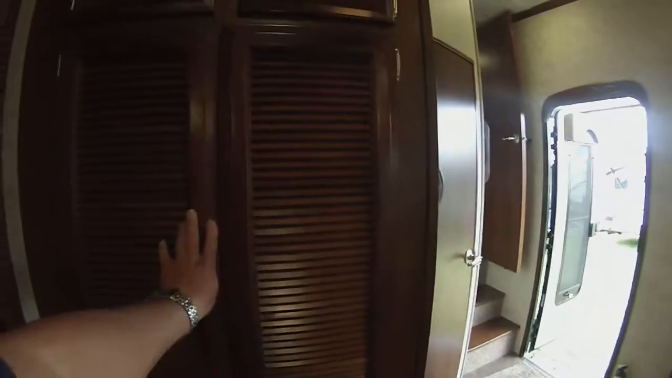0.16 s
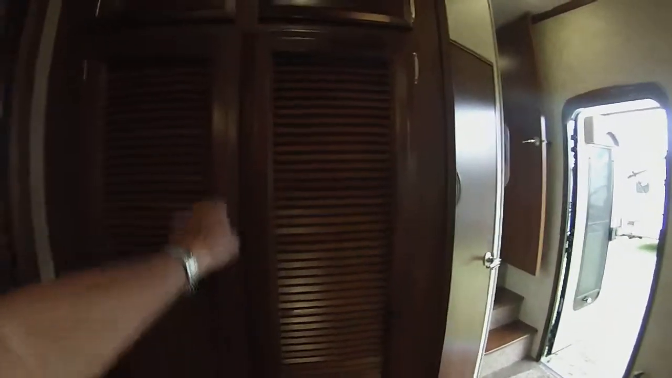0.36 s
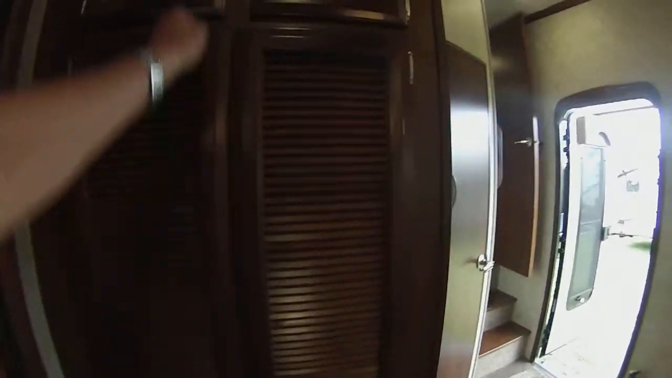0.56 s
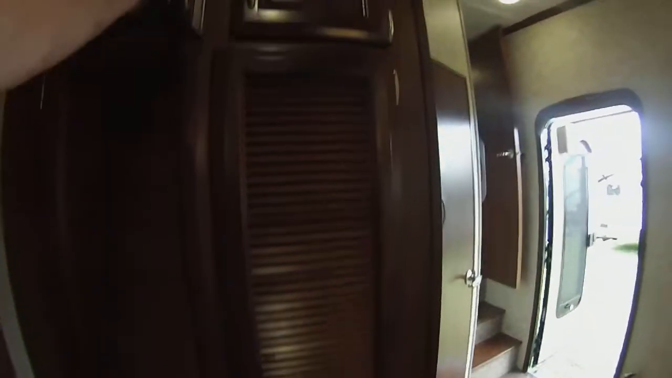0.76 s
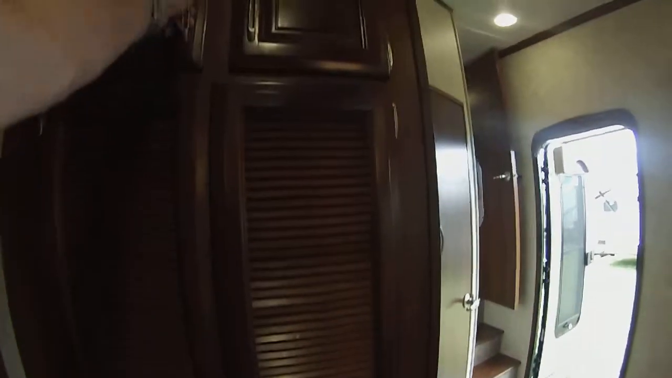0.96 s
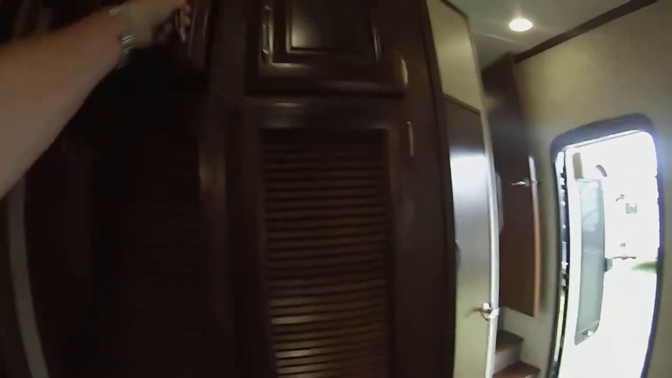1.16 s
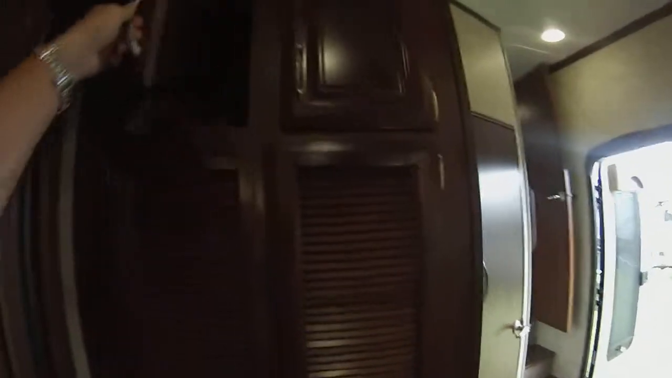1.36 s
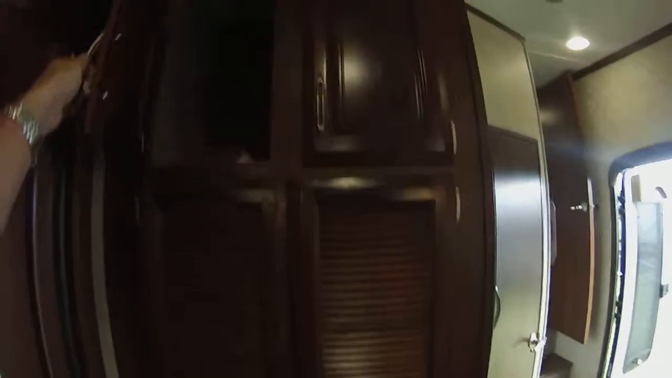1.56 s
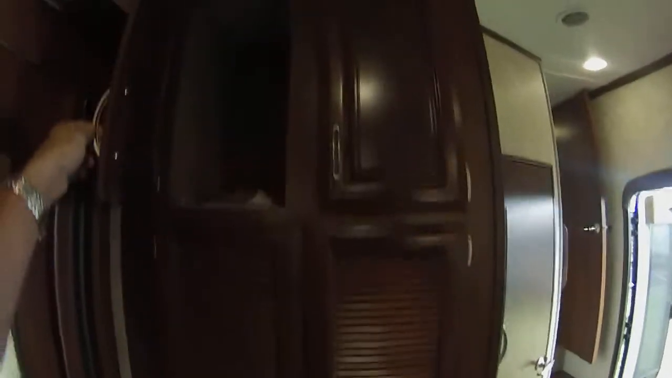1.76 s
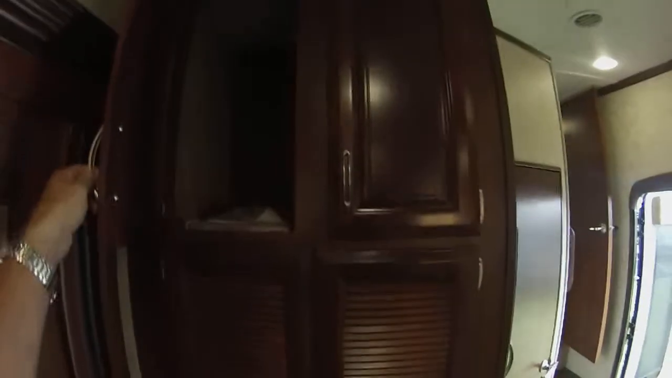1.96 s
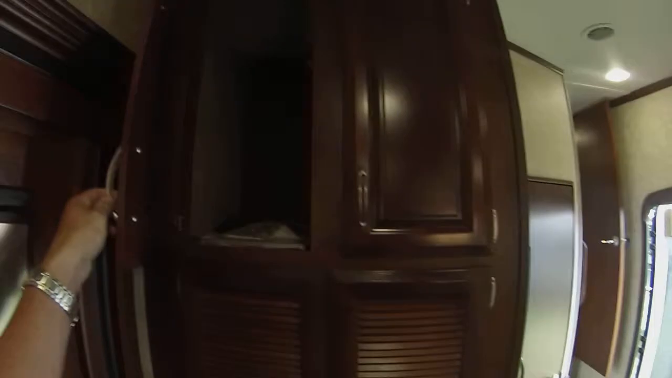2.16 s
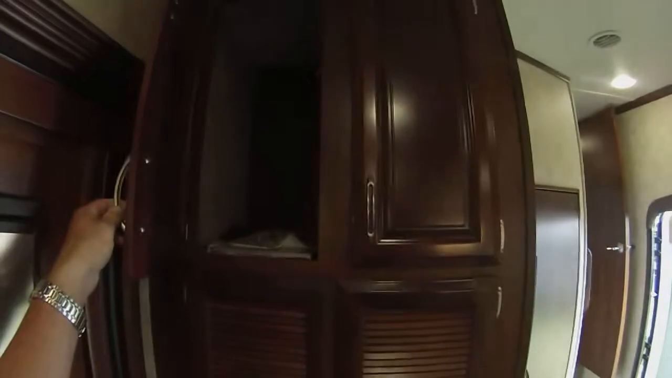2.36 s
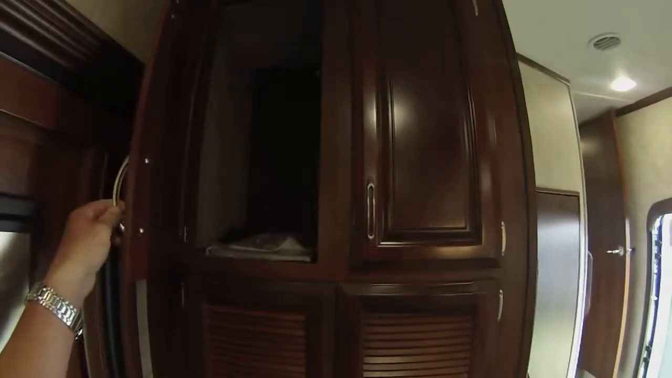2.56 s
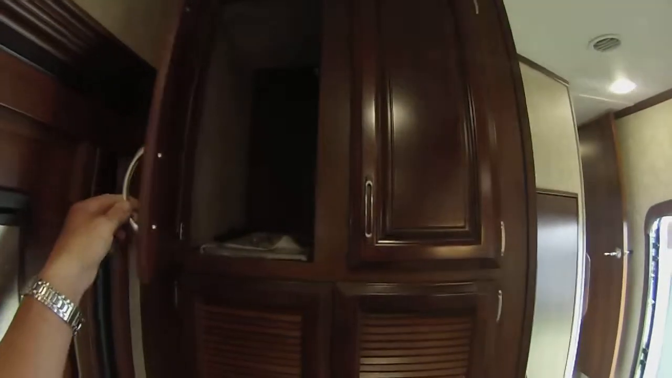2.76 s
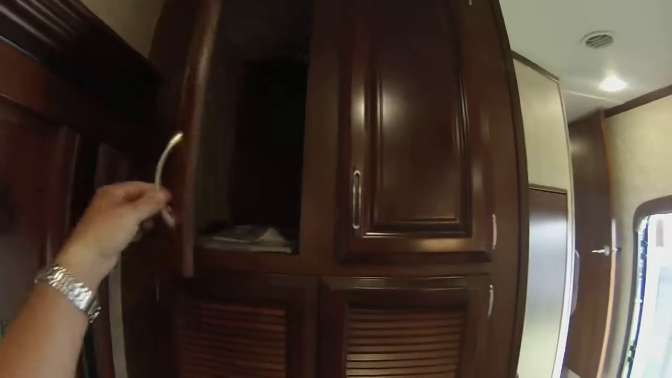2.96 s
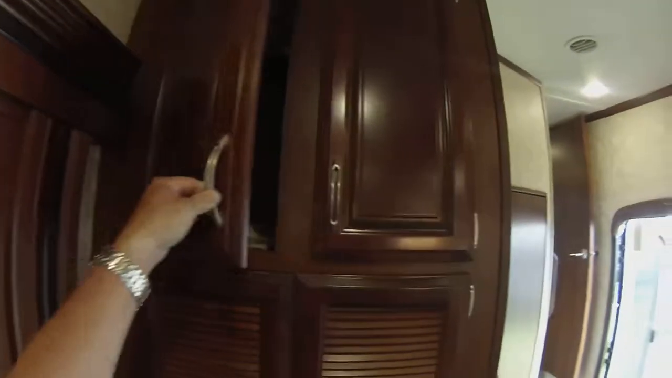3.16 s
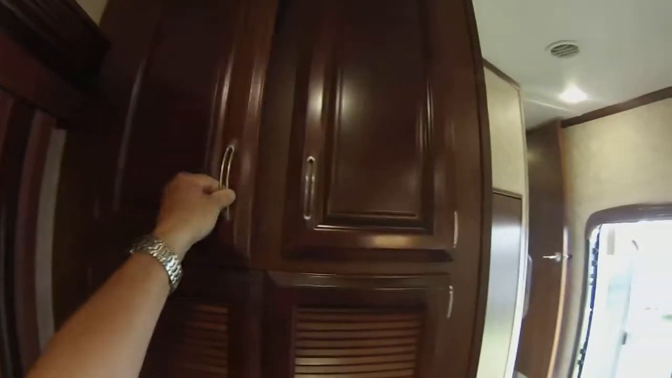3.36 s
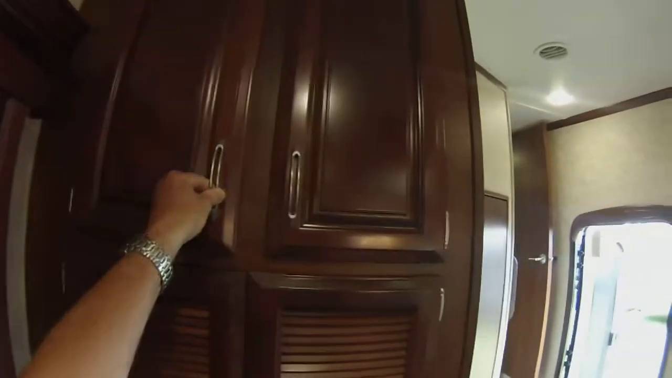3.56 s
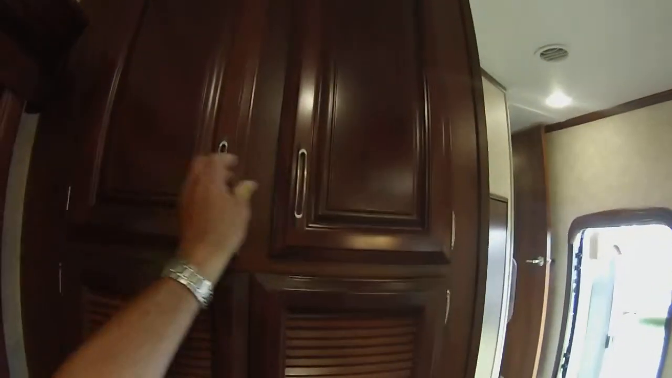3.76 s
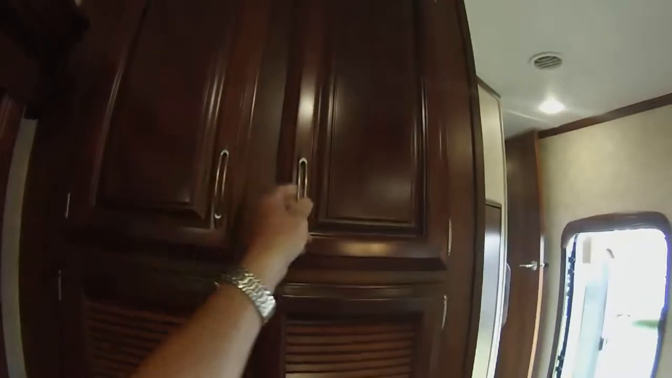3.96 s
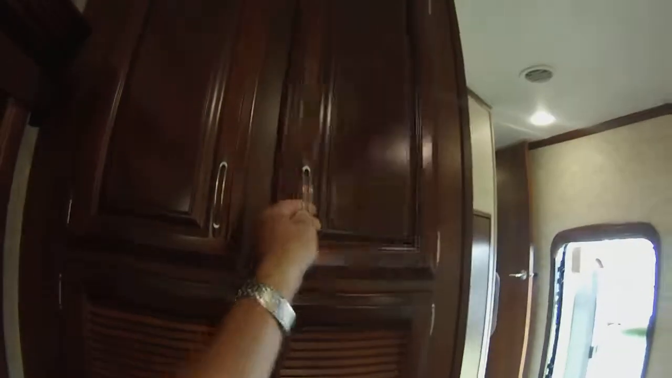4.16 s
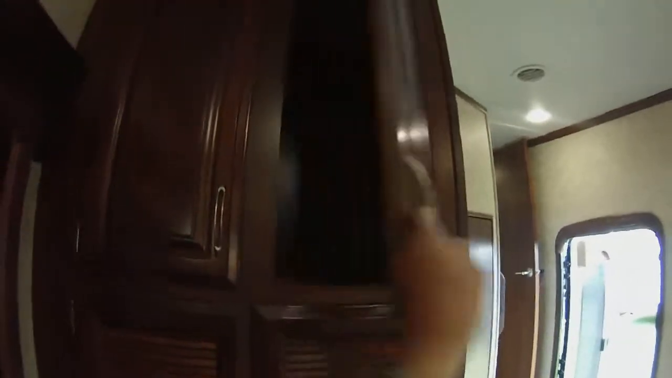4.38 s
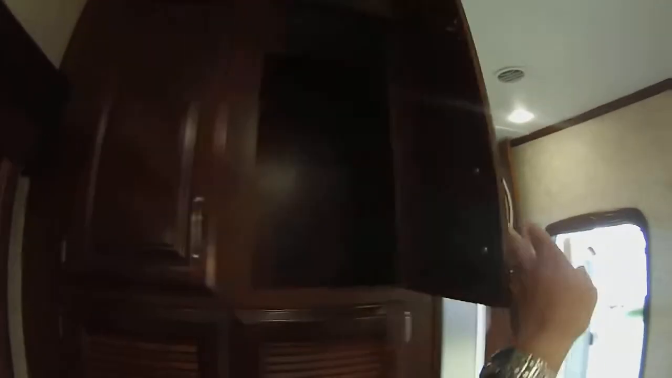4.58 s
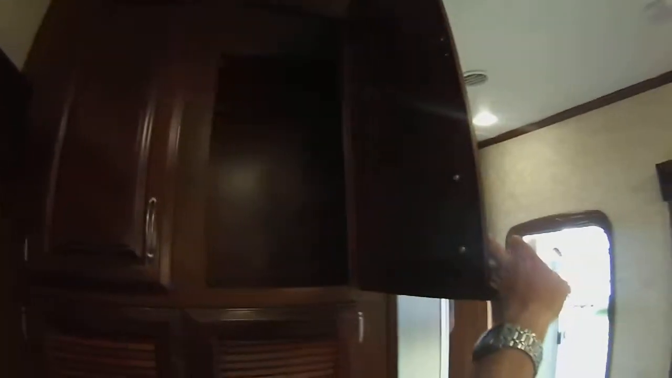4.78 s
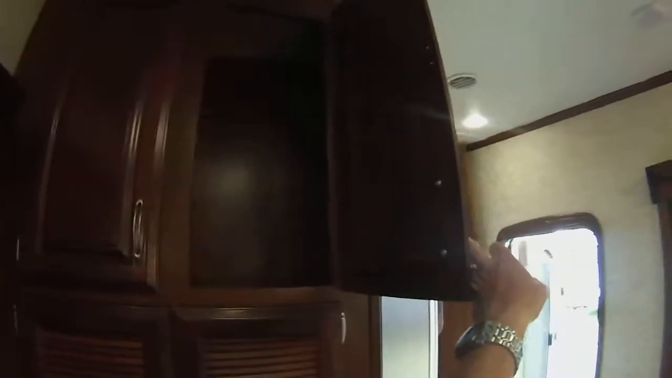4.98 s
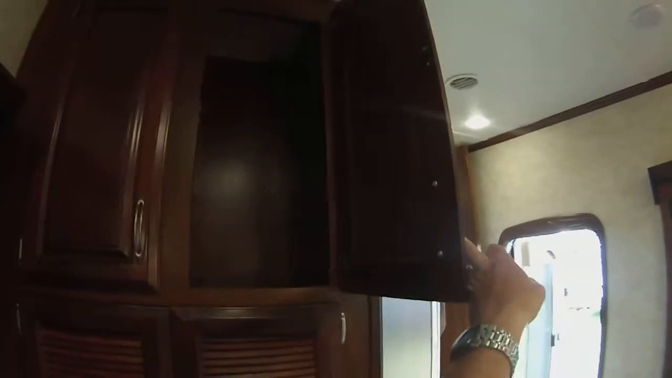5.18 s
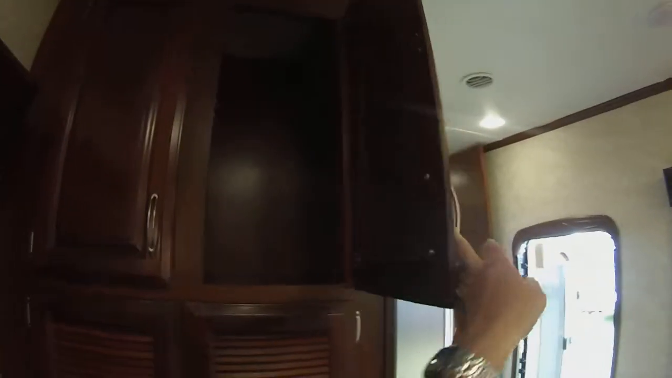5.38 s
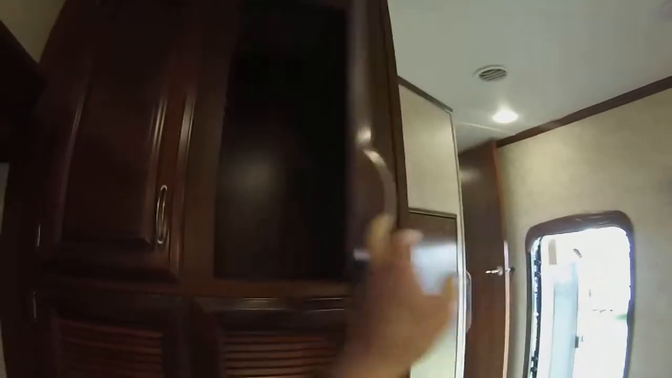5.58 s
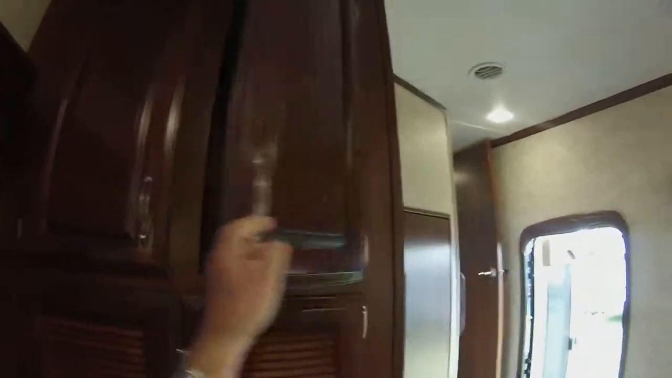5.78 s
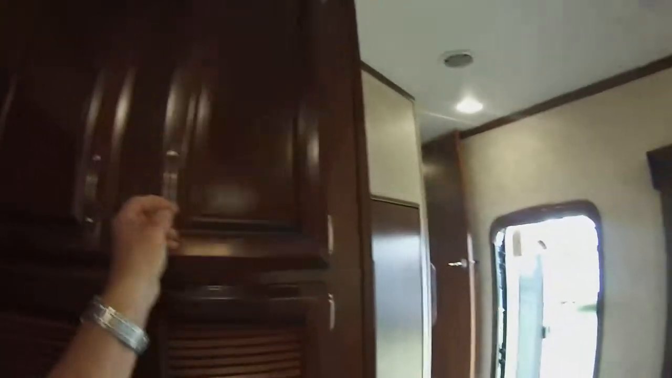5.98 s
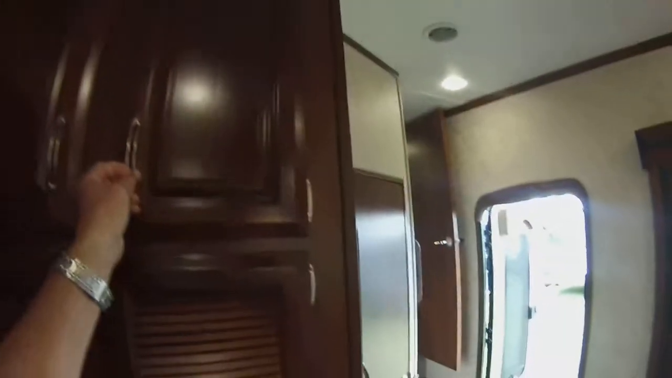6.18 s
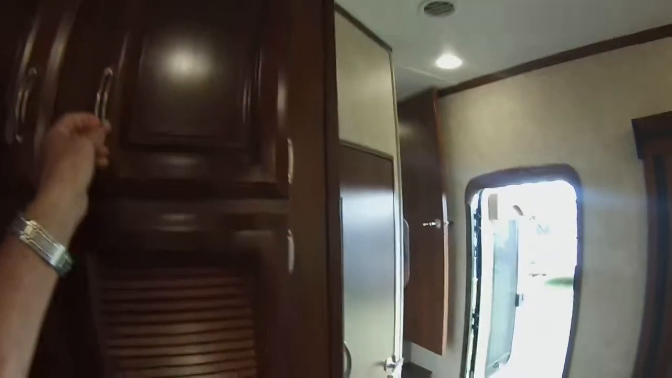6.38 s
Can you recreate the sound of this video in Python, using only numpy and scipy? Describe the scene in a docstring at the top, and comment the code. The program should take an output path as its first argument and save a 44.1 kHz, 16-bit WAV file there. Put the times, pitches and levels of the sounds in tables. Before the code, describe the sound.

Close, mono handheld sound in a cramped wood-lined cabin: a quick double clap of slatted wood with a short room tail, quiet taps, a dull knock with catch click, then a heavy low thud as a cupboard closes. More light clicks follow, then a final pair of knocks and a boom. Blunt grip jolts and muffled rubbing come between, over faint appliance hum and hiss.

```python
"""Inside a small camper, a hand-held camera's microphone hears wooden cabinet doors worked by hand.
First a louvred door claps twice and stirs faintly; from about one second a solid door knocks and booms.
Contacts are noise bursts and damped modes with a short cabin tail; landings add low modes and a shudder.
Between and over them the grip gives dry jolts and, in coloured noise, sway and rubbing at the microphone.
Throughout, wavering sine tones of an appliance hum lie over shaped microphone hiss."""
import sys
import numpy as np
from scipy import signal
from scipy.fft import rfft, irfft, next_fast_len
from scipy.io import wavfile
from scipy.ndimage import map_coordinates

SR = 44100
rng = np.random.default_rng(int(sys.argv[2]) if len(sys.argv) > 2 else 0)


def transcribe(u):
    """Save the signal u as a 16-bit wav file named by the first command-line argument.

    u: samples, shape (n,) or (channels, n), limited to [-1, 1]; the rate is SR.
    q: integer samples, one column per channel.
    """
    v = np.clip(np.atleast_2d(u).T, -1, 1)
    q = np.round(v * 32767).astype(np.int16)
    wavfile.write(sys.argv[1], SR, q)


def convert_level_to_amplitude(level_db):
    """Map a level in decibels to its linear amplitude factor."""
    exponent = np.asarray(level_db, float) / 20
    return 10 ** exponent


N = 283563
TIME = np.arange(N) / SR


def unit(x):
    """Scales a sound to rms 1."""
    return x / np.sqrt(np.mean(x ** 2) + 1e-20)


def peak(x):
    """Scales a sound to peak 1."""
    return x / np.abs(x).max()


def along(points, hz):
    """Reads (frequency, value) points on a logarithmic frequency axis."""
    point_hz, value = np.transpose(points)
    return np.interp(np.log(hz + 1), np.log(point_hz + 1), value)


def wobble(rate):
    """Draws a smooth random curve with rate knots a second."""
    knots = rng.standard_normal(int(N * rate / SR) + 4)
    return map_coordinates(knots, [TIME * rate])


def noise(spectrum):
    """Colours white noise by a spectrum in dB per Hz and scales it to rms 1."""
    size = next_fast_len(N)
    gain = convert_level_to_amplitude(along(spectrum, np.fft.rfftfreq(size, 1 / SR)))
    white = rfft(rng.standard_normal(size))
    return unit(irfft(white * gain, size)[:N])


def add(track, start_s, sound):
    """Lays a sound on the track at start_s."""
    part = track[round(start_s * SR):][:len(sound)]
    part += sound[:len(part)]


def ring(modes, t, scatter_db, favoured_hz=None, spread=0.78):
    """Sums damped modes of scattered strength; the blow favours those near one pitch (spread in octaves)."""
    hz, db, t60 = np.transpose(modes)[:, :, None]
    db = db + scatter_db * rng.standard_normal(hz.shape)
    if favoured_hz:
        db = db - 6 * (np.log2(hz / favoured_hz) / spread) ** 2
    decay = convert_level_to_amplitude(db - 60 * t / t60)
    return -np.sum(decay * np.sin(2 * np.pi * hz * t), axis=0)


# Louvred door, each contact: start_s, click_level_db (peak), click_pitch_hz,
# knock_level_db (over the click), knock_pitch_hz
LOUVRE_HITS = [(.0647, -30.5, 3780, 11, 403), (.0997, -35.5, 2600, 15, 400),
               (.3145, -67.5, 2500, 20.5, 260), (.4054, -58, 3300, -2, 593), (.5673, -69, 1200, 26, 250)]
# Its slatted wood, each knocking mode: pitch_hz, level_db (relative), t60_s
LOUVRE_KNOCK = [(250, -4.5, .08), (323.5, 0.5, 0.053), (391.6, -2.5, 0.094), (500, -6.5, 0.057),
                (650, 1, 0.02), (920, 1, 0.017), (1100, 5, 0.022), (1330, 15, 0.019)]
# Its weight landing on the frame or leaving it: start_s, boom_level_db (peak)
LOUVRE_LANDINGS = [(.0647, -21), (.0997, -18), (.3145, -38), (.5673, -34)]
# Its cabinet, each booming mode: pitch_hz, level_db (relative), t60_s
LOUVRE_BOOM = [(75, -15, 0.34), (115, -6, 0.31), (184.4, -0.5, 0.15)]


def louvred_door():
    """The louvred door: brief clicks, a long loose rattle, much cabin and only a slight puff of air."""
    contacts = door(LOUVRE_HITS, LOUVRE_KNOCK, click_t60=0.0057, rattle_t60=0.069, wet_db=1.0)
    return contacts + booms(LOUVRE_LANDINGS, LOUVRE_BOOM, puff=0.087, swell=0.0031, shudder_db=-27)


# Solid door, each contact: start_s, click_level_db (peak), click_pitch_hz,
# knock_level_db (over the click), knock_pitch_hz
PANEL_HITS = [(1.074, -54.5, 4000, 16, 590), (1.1025, -47.5, 2740, 18, 390),
              (1.1572, -64.5, 1620, 25.5, 280), (1.468, -58.5, 1810, 25, 690), (1.6574, -45, 4770, 22, 242),
              (1.6664, -41.5, 1820, 13.5, 412), (2.6452, -42, 3120, 7, 360), (2.651, -47, 4800, 3, 900),
              (3.4975, -44, 2980, 16.5, 367), (3.5625, -40, 4500, 20.5, 520), (3.5703, -31, 1300, 13, 920),
              (3.584, -50.5, 1600, 32, 228), (3.5971, -52, 9300, 9, 500), (3.6491, -54.5, 8950, -5, 500),
              (4.139, -47.5, 2900, 5, 600), (4.144, -51, 8500, 13, 1100), (4.1875, -41.5, 3470, 8.5, 400),
              (4.206, -50, 2500, 11, 400), (6.1327, -35.5, 4640, 6.5, 500), (6.2475, -36.5, 1300, 13, 910),
              (6.2742, -53.5, 1720, 27, 250)]
# Its panel, each knocking mode: pitch_hz, level_db (relative), t60_s
PANEL_KNOCK = [(242, 1.5, 0.044), (295, -11, 0.045), (384, 1.5, 0.033), (469, -21, 0.19), (554, -10, 0.061),
               (684, -1.5, 0.011), (860, -16, 0.021), (1060, -10.5, 0.021), (1268, -20.5, 0.11),
               (1600, -23, 0.024)]
# Its weight landing on the frame or leaving it: start_s, boom_level_db (peak)
PANEL_LANDINGS = [(1.074, -35.5), (3.497, -27.5), (3.5618, -12.5), (6.1327, -35), (6.2475, -16.5)]
# Its cabinet, each booming mode: pitch_hz, level_db (relative), t60_s
PANEL_BOOM = [(47, -3, .5), (77, 0, .3), (140, -10, .15), (190, -14, .1)]


def solid_door():
    """The solid door: longer clicks, a tight rattle, less cabin and a strong puff of air."""
    contacts = door(PANEL_HITS, PANEL_KNOCK, click_t60=0.019, rattle_t60=0.0096, wet_db=-5.5)
    return contacts + booms(PANEL_LANDINGS, PANEL_BOOM, puff=1.39, swell=0.0058, shudder_db=-11)


SEAT_S = 0.0023  # the wood takes about this long to meet in full
# The sprung steel catch, each mode: pitch_hz, level_db (relative), t60_s
CATCH = [(1300, 3, 0.015), (1620, -9.5, 0.017), (2500, 0, 0.039), (2600, -8, 0.029), (3300, 1, 0.019),
         (3800, -0.5, 0.068), (4244, 0, 0.066), (4730, 12.5, 0.02), (5050, 7, 0.0077), (8400, -2, 0.0079),
         (9400, -0.5, 0.005)]


def door(hits, knock, click_t60, rattle_t60, wet_db):
    """Each contact excites the steel catch and the wood's modes by noise bursts, then the cabin answers."""
    track, t = np.zeros(N), TIME[:SR // 2]
    hz = np.fft.rfftfreq(len(t), 1 / SR)
    # the crack of wood on wood
    lowpass = 0.12 / (1 + 1.2j * hz / 5200 - (hz / 5200) ** 2) ** 2.03
    crack = lowpass * 1j * hz / (700 + 1j * hz)
    for start_s, click_db, click_hz, knock_db, knock_hz in hits:
        burst = rng.standard_normal(len(t)) * convert_level_to_amplitude(-60 * t / click_t60) * (1 - np.exp(-t / 0.00037))
        catch = peak(rfft(ring(CATCH, t, scatter_db=3, favoured_hz=click_hz, spread=0.24)))
        click = peak(irfft(rfft(burst) * (crack + catch), len(t)))
        # the loose door chatters on its frame
        rattle = rng.standard_normal(len(t)) * convert_level_to_amplitude(-60 * t / rattle_t60) * (1 - np.exp(-t / SEAT_S))
        modes = ring(knock, t, scatter_db=1.0, favoured_hz=knock_hz)
        wood = peak(signal.fftconvolve(rattle, modes)[:len(t)])
        click_gain, knock_gain = convert_level_to_amplitude(click_db), convert_level_to_amplitude(click_db + knock_db)
        add(track, start_s, click_gain * click + knock_gain * wood)
        # the walls get the smoothed colour of the blow, each part with its own energy
        click_colour = unit(irfft(crack + 0.13 * catch, len(t))) * click.std()
        wood_colour = unit(modes) * wood.std()
        sent = click_gain * click_colour + knock_gain * wood_colour
        add(track, start_s + .003, convert_level_to_amplitude(wet_db) * signal.fftconvolve(sent, cabin_tail()))
    return track


# Reverberation of the camper's cabin: pitch_hz, t60_s
CABIN = [(200, 0.27), (1000, 0.24), (4500, 0.21), (6000, 0.071), (12000, 0.074)]


def cabin_tail():
    """Draws a fresh reverberant tail of energy 1 in which each frequency dies at its own speed."""
    hz, t, cells = signal.stft(rng.standard_normal(SR // 2), SR, nperseg=256)
    decay = convert_level_to_amplitude(-60 * t / along(CABIN, hz)[:, None])
    tail = signal.istft(cells * decay, SR, nperseg=256)[1][:SR // 2]
    return tail / np.linalg.norm(tail)


SHUDDER_S = 0.048  # from a landing to the crest of its low shaking
# Low shaking, heard after landings and again in the hand's sway: pitch_hz, level_db (per Hz, relative)
SWAY = [(15, -120), (22, -13.5), (40, -14), (70, -17), (110, -22.5), (200, -41.5), (400, -120)]


def booms(landings, boom, puff, swell, shudder_db):
    """Each landing rings the cabinet's low modes, squeezes out air and starts a shudder that swells and dies."""
    track, shaking, t = np.zeros(N), np.zeros(N), TIME[:SR // 2]
    for start_s, db in landings:
        modes = ring(boom, t, scatter_db=2)
        thud = peak(modes * (1 - np.exp(-(t / swell) ** 2)))
        # air squeezed out of the cabinet springs back
        air = np.sin(2 * np.pi * 59 * t) * np.exp(-((t - .014) / 0.01) ** 2)
        shudder = (t / SHUDDER_S * np.exp(1 - t / SHUDDER_S)) ** 2
        add(track, start_s, convert_level_to_amplitude(db) * thud)
        add(track, start_s - .002, -puff * convert_level_to_amplitude(db) * air)
        add(shaking, start_s, convert_level_to_amplitude(db + shudder_db) * shudder)
    return track + shaking * noise(SWAY)


# Bumps of the grip, right at the microphone: start_s, level_db, first_swing_ms, edge_ms
BUMPS = [(1.3376, -21.5, 2.7, 1), (1.4669, -9.5, 1.6, 0.94), (1.56, -21, 1.9, 1.3),
         (1.81, -34.5, 1.15, 0.81), (1.8388, -37, 1.4, 0.62), (1.9745, -33, 0.9, 1.2),
         (2.161, -28, 2.3, 1.2), (2.2194, -22, 1.16, 1.8), (2.2228, -21, 1.06, 1.17),
         (2.241, -14, 2.74, 1.8), (3.8882, -33.5, 1.7, 0.8), (3.94, -31.5, 0.98, 1.2),
         (3.9772, -30, 1.77, 0.68), (4.0573, -28, 1, 1.15), (4.319, -31.5, 1.24, 0.9),
         (4.342, -19.5, 4.5, 3.1), (4.3567, -20.5, 2.7, 1.3), (4.3651, -27.5, 0.67, 0.081),
         (4.394, -20.5, 2.07, 1.9), (4.4713, -26, 1.23, 1.06), (4.587, -12.5, 1.7, 0.24),
         (4.6034, -9.5, 2.28, 0.34), (5.2805, -30.5, 1.8, 2.1), (5.9706, -32, 0.88, 1.3),
         (6.0067, -30.5, 2.3, 0.76), (6.025, -22, 2.9, 1.7), (6.0648, -24.5, 1.4, 1.9)]


def bumps():
    """Dry jolts of the microphone, with no cabin around them."""
    track = np.zeros(N)
    for start_s, db, swing_ms, edge_ms in BUMPS:
        # the rounded edge leads the swing
        add(track, start_s - edge_ms / 1000, -convert_level_to_amplitude(db) * jolt(TIME[:SR // 20], swing_ms, edge_ms))
    return track


def jolt(t, swing_ms, edge_ms):
    """One push: a first swing, a wider rebound, a slow settling; its start is rounded over edge_ms each way."""
    u = t * 1000 / swing_ms
    swing = np.sin(np.pi * u ** 0.59) * np.exp(-((u - 1.5) / 2.46) ** 2)
    edge = np.hanning(int(edge_ms * SR / 500) + 3)
    return np.convolve(swing, edge / edge.sum())[:len(t)]


MOVE_ATTACK_S, MOVE_RELEASE_S = 0.066, 0.15
REST_RUB_DB, REST_SWAY_DB = -60, -46.5  # with the hand at rest
SWAY_PER_EFFORT = 0.6  # dB of sway per dB of effort
# Swells of sway and rubbing, mostly movements of the camera hand, the first a low stir after the louvred door's
# claps: start_s, hold_s, effort_db (over rest)
MOVES = [(0.09, 0.092, 25), (0.303, 1, 6), (1.169, 0.26, 20.5), (1.476, 0.26, 14), (2.132, 0.13, 10),
         (3.854, 0.39, 4), (4.263, 0.33, 11.5), (5.866, 0.45, 5.5)]
# Skin on the camera's shell: pitch_hz, level_db (per Hz, relative)
RUBBING = [(60, -120), (90, 1), (130, 3), (200, 2), (300, -7), (500, -18.5), (900, -31), (2000, -120)]


def grip():
    """The moving hand sways the camera and rubs on its shell in lumps; one effort drives both, and it also
    carries the low stir after the louvred door's claps."""
    efforts = []
    for start_s, hold_s, db in MOVES:
        end_s = start_s + hold_s
        corners = [start_s - MOVE_ATTACK_S, start_s, end_s, end_s + MOVE_RELEASE_S]
        efforts.append(db * np.interp(TIME, corners, [0, 1, 1, 0]))
    effort_db = np.max(efforts, axis=0)
    drift = convert_level_to_amplitude(2.5 * wobble(4.5))
    sway = convert_level_to_amplitude(REST_SWAY_DB + SWAY_PER_EFFORT * effort_db) * unit(drift * noise(SWAY))
    lumps = convert_level_to_amplitude(1.3 * wobble(25))
    return sway + convert_level_to_amplitude(REST_RUB_DB + effort_db) * unit(lumps * noise(RUBBING))


# Tones of the appliance: pitch_hz, level_db (rms before wavering), waver_db
HUM = [(90.2, -47, 0.4), (213, -62, 2), (279, -78.5, -8), (304, -75, 5), (549, -84.5, -11)]


def hum():
    """Sustained appliance tones whose strength and phase waver."""
    track = np.zeros(N)
    for hz, db, waver_db in HUM:
        strength = np.sqrt(2) * convert_level_to_amplitude(db + waver_db * wobble(11.0))
        track += strength * np.sin(2 * np.pi * hz * TIME + 0.25 * wobble(2.2))
    return track


HISS_DB = -61.5  # rms
# The microphone's own noise: pitch_hz, level_db (per Hz, relative)
HISS = [(100, -55), (250, -6), (400, -4), (600, -9.5), (1000, -12.5), (2000, -18), (4000, -22.5),
        (8000, -29), (13000, -35), (16000, -45)]


def hiss():
    """Steady microphone hiss, noise that falls off towards the treble."""
    return convert_level_to_amplitude(HISS_DB) * noise(HISS)


def scene():
    """Both doors, the grip, the hum and the hiss at one microphone, in mono."""
    doors = louvred_door() + solid_door()
    handling = bumps() + grip()
    return (doors + handling + hum() + hiss())[None]


def top_cut(x):
    """Nothing passes above the cut-off."""
    return signal.sosfilt(signal.butter(12, 15590, fs=SR, output="sos"), x)


def record(dry):
    """Closes the take with a 4 ms fade."""
    close = np.clip((TIME[-1] - TIME) / .004, 0, 1)
    return top_cut(dry * close)


dry = scene()
out = record(dry)
transcribe(out)
```